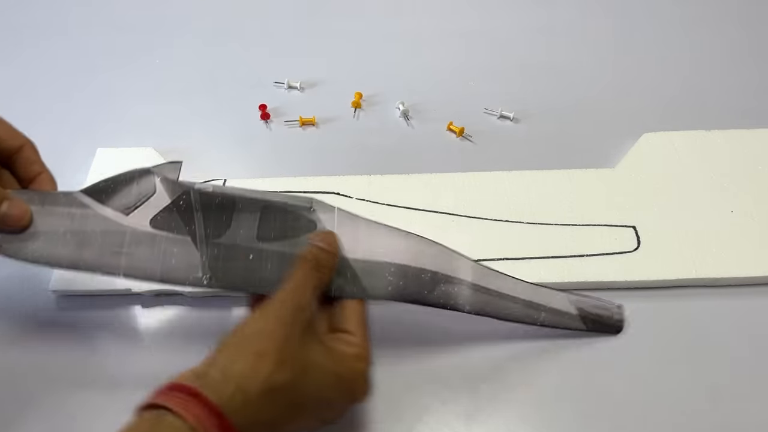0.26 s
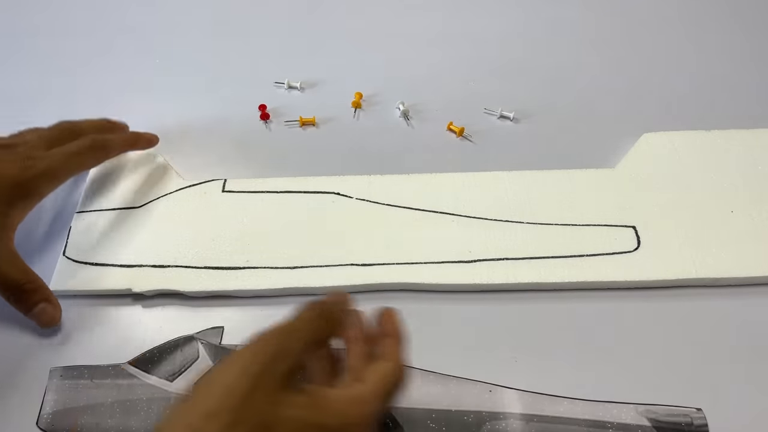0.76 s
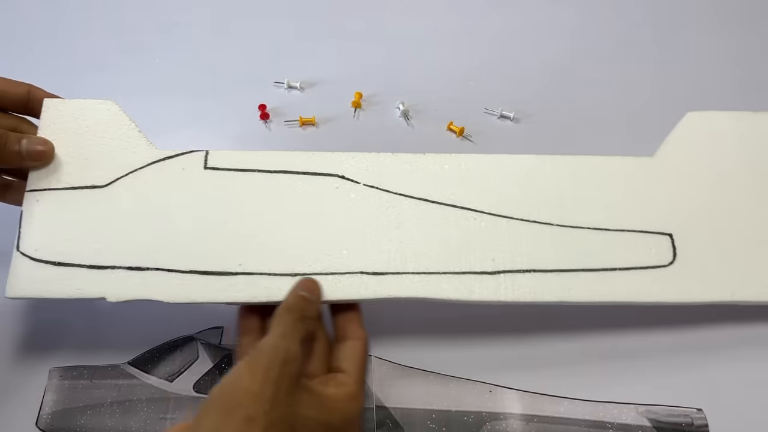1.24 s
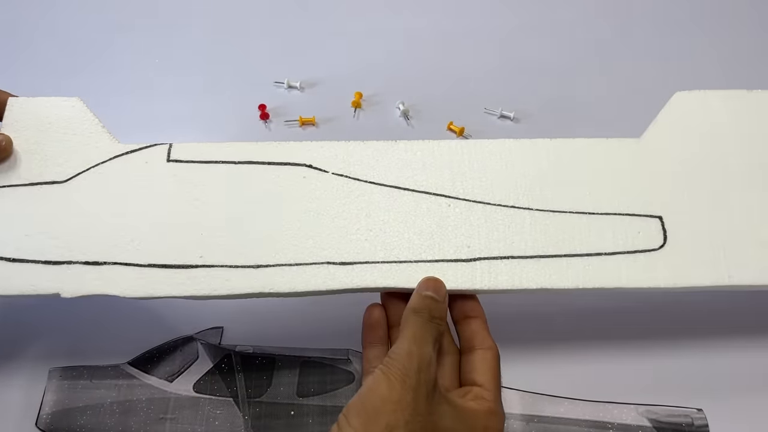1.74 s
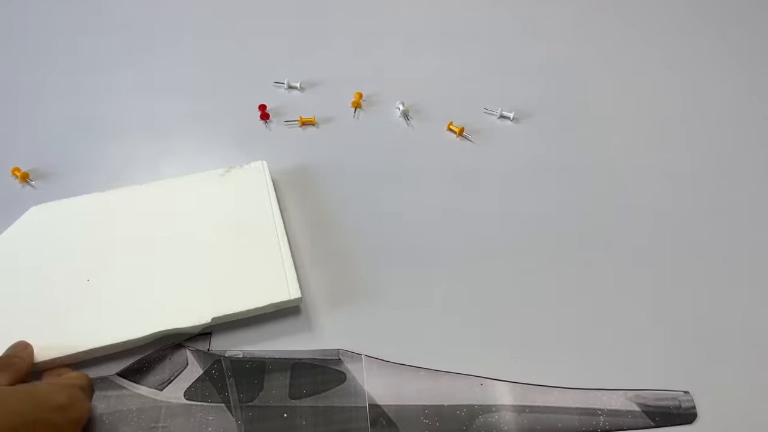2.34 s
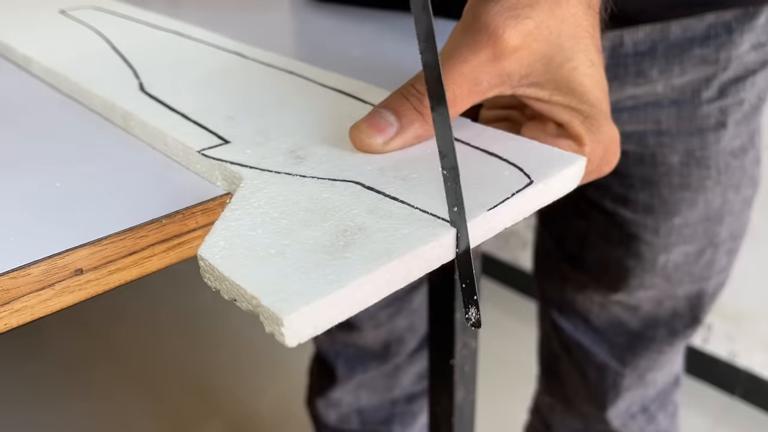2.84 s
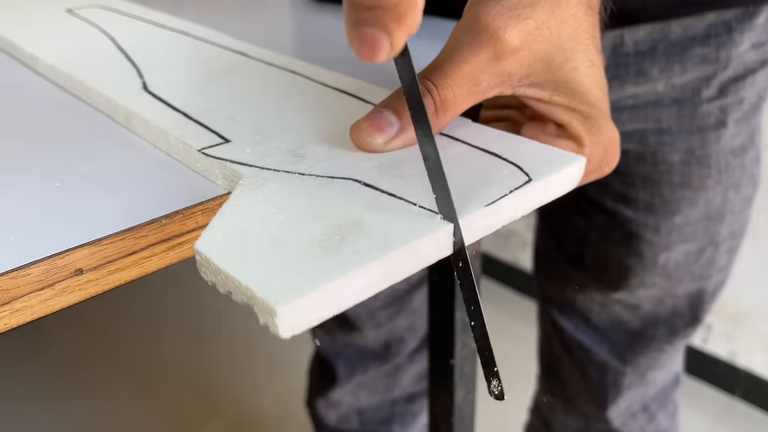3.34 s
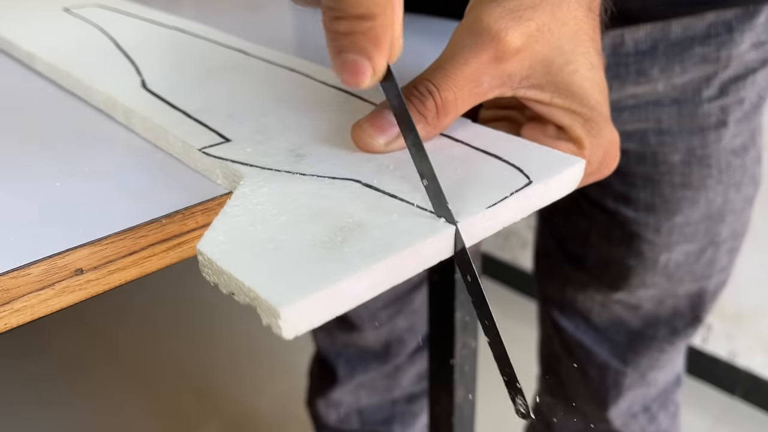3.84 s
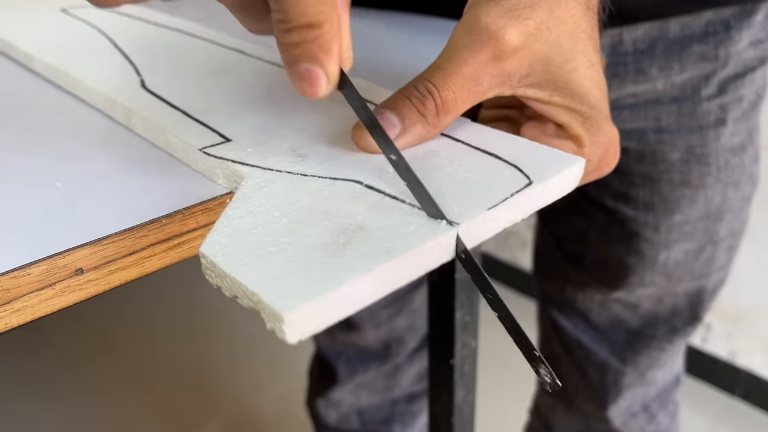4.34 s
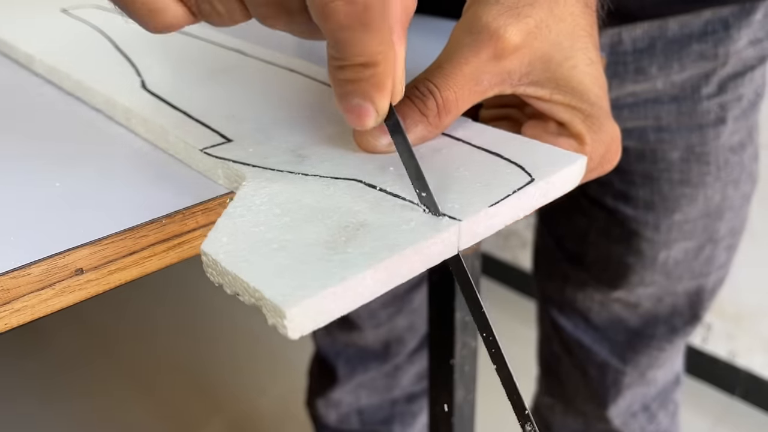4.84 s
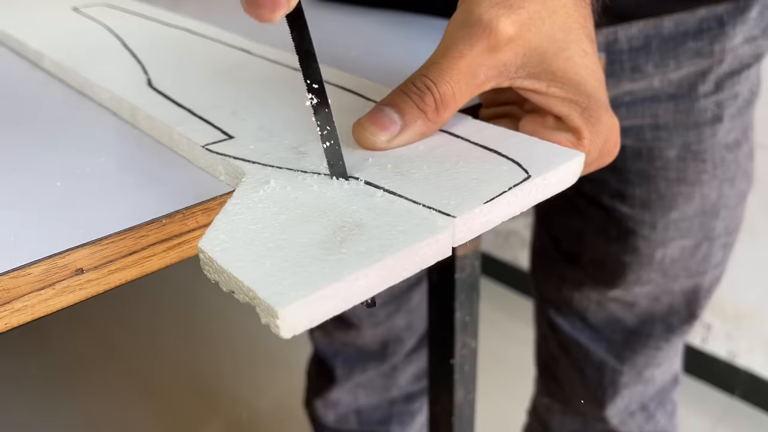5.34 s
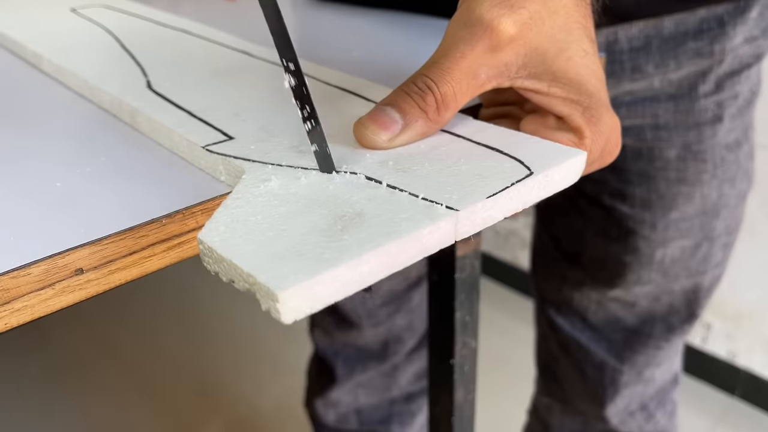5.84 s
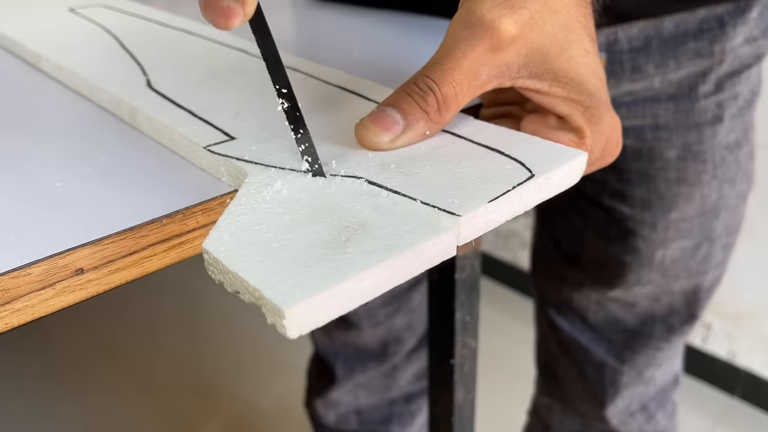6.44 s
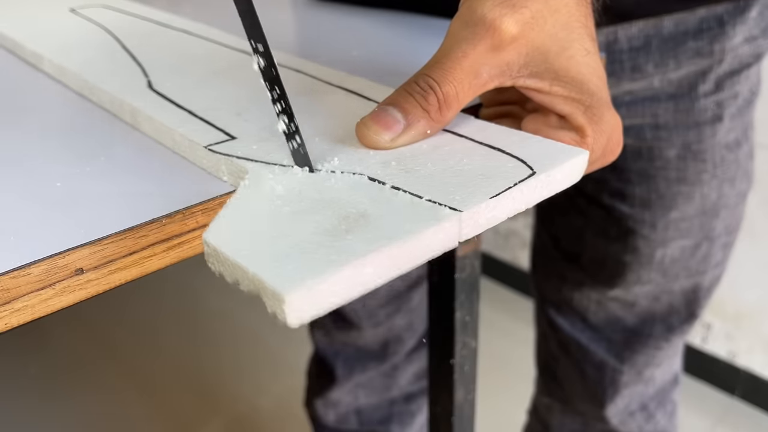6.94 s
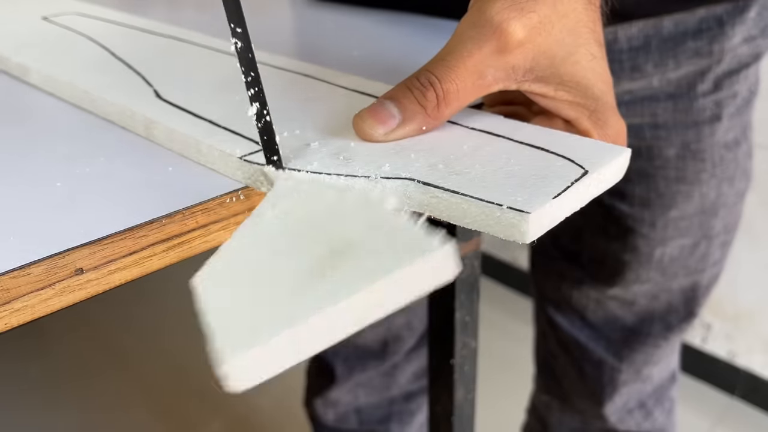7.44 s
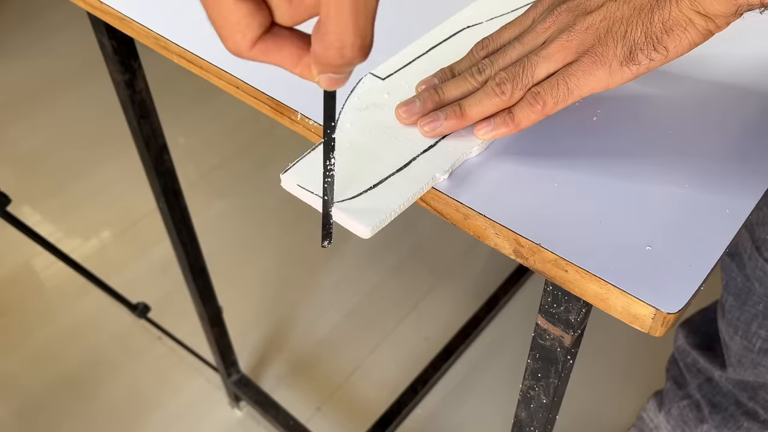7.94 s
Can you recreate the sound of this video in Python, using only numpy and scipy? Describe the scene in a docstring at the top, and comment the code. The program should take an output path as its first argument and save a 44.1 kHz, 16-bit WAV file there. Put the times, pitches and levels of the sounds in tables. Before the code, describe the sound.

Over a low, steady room rumble, paper slides softly and a foam sheet is tapped and shifted on a table. A bare hacksaw blade then saws the foam close to the microphone in quick back-and-forth strokes, a scratchy rasp with hollow shudders and sharp catches. Near the end a bird outside chirps five times, the light offcut drops and bounces, and a new cut begins.

```python
"""Over the low murmur of a building, a paper pattern is lifted; soft taps and slides follow on a foam sheet.
From 2.6 s a bare hacksaw blade saws the sheet at a table edge: its teeth rasp through the cells and
shake the overhang, whose modes sink as the cut frees it. At 7.4 s a bird starts to chirp outside;
at 7.8 s the offcut drops, bounces and settles with a faint rustle, and at 8 s a new cut begins.
Two microphone ports a few centimetres apart hear it all."""
import sys
import numpy as np
from scipy import signal
from scipy.fft import rfft, irfft, next_fast_len
from scipy.io import wavfile
from scipy.ndimage import uniform_filter1d

SR = 44100
rng = np.random.default_rng(int(sys.argv[2]) if len(sys.argv) > 2 else 0)


def dump(signal):
    """Clip the signal to [-1, 1] and save it as 16-bit WAV at the path in sys.argv[1]."""
    limited = np.clip(np.atleast_2d(signal).T, -1, 1)
    pcm = np.round(limited * 32767).astype(np.int16)
    wavfile.write(sys.argv[1], SR, pcm)


N = 361179
T = np.arange(N) / SR
FFT_SIZE = next_fast_len(N)
BAND_LIMIT_HZ = 15800

# Levels in the tables are relative; resonate() multiplies the mode pitches by a tuning factor.
# spectral density of the building's murmur: frequency_hz, level_db
MURMUR_SPECTRUM = [(15, -53), (25, -7), (130, -2.5), (167, -9), (301, -15.5), (366, -12), (404, -15.5),
                   (645, -19.5), (867, -23.5), (1110, -25), (9000, -51.5), (11700, -87.5), (19800, -120)]

# slides over the foam; last, a faint rustle as the offcut falls and settles:
# start_s, length_s, hiss_db, speed_exponent
SLIDES = [(0.032, 0.09, -59, 0.37), (0.133, 0.32, -45, 0.56), (0.42, 0.13, -64.5, 0.32),
          (.56, .1, -58.5, 0.96), (0.785, 0.43, -57.5, 1.1), (1.054, 0.47, -38, 3.3),
          (1.74, 0.33, -37, 1.84), (2.222, .24, -54.5, 1.9), (7.768, 0.28, -59.5, .4)]
# spectrum of sliding friction: frequency_hz, level_db
SLIDE_SPECTRUM = [(900, -8.5), (2500, -7), (4300, -1.5), (6000, -6), (8000, -6), (11500, -8.5),
                  (13500, -12.5), (15600, -6.5)]
# share of the friction that drives the modes, paper first, then sheet: time_s, share_db
MODE_SHARE = [(.5, -13), (1.0, -2)]
# light taps as the paper pattern is lifted, then soft taps on the sheet: start_s, tick_db, tone_db
TAPS = [(0.168, -29, -45.5), (0.2775, -24, -42.5), (0.9694, -21.5, -39.5), (1.0022, -20.5, -35.5),
        (1.0232, -41, -36), (1.516, -65, -32), (2.2454, -42, -48)]
# modes of the loose paper and of the sheet lying on the table: pitch_hz, width_hz, level_db
PAPER_MODES = [(1340, 750, 1.5), (1720, 210, 13.5), (2100, 650, 7), (4150, 300, -14)]
LYING_MODES = [(656, 315, -2), (842, 205, 5), (987, 124, 7.5), (1625, 75, 2), (2425, 280, -3),
               (4700, 190, -3)]
PAPER_UNTIL_S, TAP_CUTOFF_HZ = 0.75, 1600

# blade strokes, push and pull in turn: start_s, length_s, ring_db, flap_db, rasp_db, swell_db
STROKES = [(2.594, 0.045, -37, -31.5, -55, -15), (2.887, 0.063, -35.5, -37.5, -56.5, 4.5),
           (3.023, 0.03, -31, -26.5, -65, -5), (3.137, 0.046, -39, -35.5, -49, -12.5),
           (3.271, 0.015, -29.0, -23, -47.5, -4.5), (3.394, 0.045, -45, -41.5, -55, -19.5),
           (3.494, 0.043, -36, -29, -57.5, 11), (3.627, 0.044, -36, -36, -53, -5),
           (3.763, 0.024, -31, -25.5, -60, -11), (3.872, 0.044, -42.0, -43, -50.5, -21),
           (3.989, 0.058, -39.5, -33.5, -50, -3.5), (4.126, 0.029, -42.5, -37.5, -45.5, -19),
           (4.233, 0.058, -41, -33.5, -47.5, -20.5), (4.37, 0.082, -44, -40.5, -49, -13.0),
           (4.532, 0.14, -45, -38.5, -47.5, -6), (4.758, 0.073, -44.5, -42.5, -44.5, -2),
           (4.917, 0.055, -34, -29, -50, -6), (5.064, 0.059, -39, -37, -45, -2),
           (5.222, 0.021, -41, -37.5, -46, -13.5), (5.309, 0.029, -44, -46, -27, -1),
           (5.414, 0.027, -40, -30.5, -51, -8.5), (5.497, 0.059, -39, -35, -40.5, 2.5),
           (5.612, 0.024, -37.5, -30.5, -35, 11.5), (5.718, 0.052, -41.5, -39.5, -42, 11.5),
           (5.844, 0.035, -40.5, -33, -45.5, 8.5), (5.95, 0.047, -39, -34, -41, 7),
           (6.067, 0.029, -39, -30.5, -38.5, 8.5), (6.175, 0.048, -42.5, -35.5, -41.5, 11.5),
           (6.302, 0.026, -38, -29.5, -39.5, -13), (6.402, 0.04, -45.5, -39.5, -44.5, 9),
           (6.511, 0.031, -36, -29, -38.5, -7.5), (6.611, 0.04, -43, -35, -46.5, 12.5),
           (6.735, 0.028, -36.0, -30, -37, 2), (6.827, 0.054, -47, -41, -40.5, 13.5),
           (6.956, 0.043, -40.5, -29.5, -42, -15.5), (7.055, 0.099, -47.5, -57.5, -48, -5.5),
           (7.208, 0.03, -38, -44.5, -46.5, 15.5), (7.295, 0.053, -46, -54, -44, 5.5),
           (7.426, 0.024, -40, -47.5, -42, -8.5), (7.499, 0.028, -44.5, -58.5, -46.5, 12),
           (8.009, 0.029, -42.5, -40, -51, -19.5), (8.1, 0.063, -41, -45.5, -60, -9)]
# teeth catch and tear free: start_s, rasp_db, jolt_db
CATCHES = [(2.592, -35, -21), (2.603, -20, -35), (2.623, -38, -18), (2.8855, -25, -22.5),
           (3.0214, -20.5, -20), (3.079, -19, -15), (3.1435, -55, -21), (3.269, -18.5, -15.5),
           (3.288, -26, -25.5), (3.398, -45, -23.5), (3.499, -36, -23), (3.5224, -29, -23),
           (3.56, -21.5, -22), (3.763, -29, -21.5), (3.793, -20.5, -16.5), (3.989, -42, -32),
           (4.235, -23.5, -43), (4.53, -38, -29), (4.9244, -21, -31), (5.222, -45, -40.5),
           (5.298, -22, -49), (5.409, -4.5, -39), (5.791, -11.5, -33), (6.659, -12, -44),
           (6.727, -15.5, -47), (6.7634, -45, -27), (6.956, -28, -26), (7.0605, -27, -27.5),
           (7.427, -22, -29), (8.005, -29, -27), (8.1025, -43, -41), (8.15, -45, -28.5), (8.1854, -40, -22)]
# the blade binds against the walls of the slot: start_s, length_s, rasp_db
BINDS = [(4.029, 0.032, -47.0), (4.213, 0.004, -49.5), (4.275, 0.033, -43), (4.575, 0.046, -33),
         (4.681, 0.016, -42), (4.747, 0.0042, -40), (4.884, 0.0082, -49.5), (4.971, 0.042, -43),
         (5.046, 0.015, -44), (5.155, 0.0061, -40), (5.294, 0.019, -30.5), (5.399, 0.014, -24.5),
         (5.408, 0.0081, -22.5), (5.434, 0.021, -35.5), (5.612, 0.01, -33.5), (5.704, 0.0043, -34.5),
         (5.787, 0.0032, -25), (5.839, 0.036, -36.5), (6.14, 0.004, -49), (6.257, 0.052, -36),
         (6.335, 0.0088, -31.5), (6.392, 0.015, -32.5), (6.398, 0.014, -33.5), (6.449, 0.012, -28.5),
         (6.492, 0.025, -37), (6.593, 0.02, -35.5), (6.657, 0.018, -27), (6.725, 0.013, -23),
         (6.897, 0.0047, -37), (6.921, 0.003, -46), (6.938, 0.015, -37), (7.062, 0.0044, -36),
         (7.149, 0.024, -40), (7.21, 0.01, -36), (7.342, 0.026, -31), (7.531, 0.0054, -38.5)]
# the rasp starts before the teeth bite: time_s, lead_s
RASP_LEAD = [(3.8, 0.0022), (4.1, 0.011), (7.6, 0.018), (8.0, .003)]
RASP_LINGER_S, RASP_SWELL_SHARE = 0.013, 0.39
# spectra of the rasp under light and hard pressure: frequency_hz, level_db
LIGHT_RASP_SPECTRUM = [(900, -22), (2500, -5.5), (4000, 1), (5500, -5), (6600, -6), (8500, 1), (10500, 0.5),
                       (12300, -3), (14000, -7), (15600, 2.5)]
HARD_RASP_SPECTRUM = [(2500, -23), (5600, -14.5), (6800, -11.5), (8400, 2.5), (10300, -6), (12300, 4.5),
                      (14000, -7.5), (15600, 2)]
# modes of the slot round the blade: pitch_hz, width_hz, level_db
KERF_MODES = [(3340, 170, -16.5), (4170, 46, 1.5), (5230, 200, 0.5)]
# modes of the sheet while the cut is short: pitch_hz, width_hz, level_db
SHEET_LOW_MODES = [(768, 160, -8), (1082, 72.6, 1.5), (1323, 226, -2.5)]
SHEET_HIGH_MODES = [(1300, 87, -13.5), (1818, 532, 6), (2105, 710, 1.5), (2560, 100, 6), (3700, 3250, -10)]
# modes of the sheet with a long slit: pitch_hz, width_hz, level_db
SLIT_LOW_MODES = [(614, 125, 4), (810, 98, 4.5)]
SLIT_HIGH_MODES = [(1145, 256, 7.5), (1844, 113, 4.5), (2100, 240, -1.5), (2700, 160, -11.5),
                   (3490, 130, -2.5), (3380, 130, -7), (4400, 100, 5), (5400, 210, -18.5)]
LONG_SLIT_S, NEW_CUT_S, NEW_CUT_TUNING = 5.27, 7.9, 0.756
# drive of the slit sheet's low modes on a pull, against a push: time_s, gain_db
PULL_COUPLING = [(5.2, -18), (5.5, -36), (6.2, -17), (7.0, 1.5), (7.5, -15), (8.0, 1)]
# the overhang loosens until 7 s, then rises in pitch: time_s, pitch_factor, table_share_db
STIFFNESS = [(2.5, 0.96, -14.5), (5.26, 0.94, -10), (5.401, 0.62, -16.5), (7.0, 0.47, -24.5),
             (7.2, 1.18, -19), (7.948, 1.38, -22.5)]
# modes of the overhang, and the band it passes to the air: pitch_hz, width_hz, level_db
OVERHANG_MODES = [(150, 90, -8), (208, 85, 0), (265, 95, -4)]
RADIATION_BAND = [(216, 1620, 0)]
# modes of the new cut's short corner and of the table: pitch_hz, width_hz, level_db
CORNER_MODES = [(326, 257, 2), (470, 224, 3), (626, 166, -10)]
TABLE_MODES = [(72, 31, -0.3), (108, 51, -0.44)]

# the bird's chirps: start_s, level_db
CHIRPS = [(7.36, -37), (7.477, -40), (7.594, -42.5), (7.702, -42), (7.81, -43)]
# contour of one chirp: time_s, pitch_hz, level_db
CHIRP_CONTOUR = [(0, 4380, -2), (.01, 4410, -1.5), (.02, 5000, -3), (.03, 5380, 2), (.04, 5620, 5),
                 (.05, 5550, 0), (.058, 5350, -17)]

# the offcut lands and bounces: start_s, tick_db, tone_db
BOUNCES = [(7.7734, -47.5, -47), (7.8109, -71, -39.5), (7.8199, -68, -31), (7.894, -51, -51),
           (7.95, -48.5, -50)]
# modes of the offcut: pitch_hz, width_hz, level_db
OFFCUT_MODES = [(870, 500, -12.5), (1440, 110, -7), (1740, 250, -17), (2397, 49, 4.5), (3300, 370, -6),
                (5440, 1200, -12)]

# the right port against the left: frequency_hz, coherence, level_db, lead_rad
PORTS = [(0, 0.93, 0.1, -0.16), (150, 0.93, -3, 0.65), (350, 1, -4, 1.12), (590, 0.5, -4, 0.6),
         (910, 0.17, -7, -1.47), (1500, 0.95, -1.5, -1.1), (2600, 0.82, -4.5, -1.5), (4650, 0, -9, -2),
         (6960, 0.97, -1, -2.5), (8200, 0.66, -0.5, -0.01), (10890, 1, 0.5, 4.5), (14100, 0.7, 0, 10.5)]


def gain_of(db):
    """Amplitude grows tenfold for every 20 dB."""
    return 10 ** (np.asarray(db) / 20)


def unit_rms(x):
    """Normalisation to unit mean power."""
    return x / np.sqrt(np.mean(x ** 2) + 1e-20)


def butterworth(x, order, cutoff_hz, kind="lowpass"):
    """A filter with a maximally flat passband."""
    return signal.lfilter(*signal.butter(order, cutoff_hz, kind, fs=SR), x)


def spectral_gain(hz, spectrum):
    """Interpolation of a spectrum in dB over log frequency."""
    points_hz, db = np.transpose(spectrum)
    return gain_of(np.interp(np.log(hz + 1), np.log(points_hz + 1), db, left=-80))


def coloured(x, spectrum, above_hz):
    """Spectral shaping, normalised by the power passed between above_hz and the band limit."""
    hz = np.fft.rfftfreq(1024, 1 / SR)
    gain = spectral_gain(hz, spectrum)
    gain /= np.sqrt(np.mean(gain ** 2 * (hz >= above_hz) * (hz < BAND_LIMIT_HZ)))
    impulse = np.fft.fftshift(irfft(gain)) * np.hanning(1024)
    return signal.oaconvolve(x, impulse[None], "same", axes=1)


def resonate(x, modes, tuning=0.96, polarity=-1):
    """Superposition of damped modes; with positive polarity, neighbours cancel between their peaks."""
    out = np.zeros_like(x)
    for k, (hz, width, db) in enumerate(modes):
        phasor = np.exp(2j * np.pi * np.cumsum(hz * tuning * np.ones(N)) / SR)
        pole = np.exp(-np.pi * width / SR)
        amplitude = signal.lfilter([1 - pole], [1, -pole], x * phasor.conj())
        out += polarity ** k * gain_of(db) * 2 * (phasor * amplitude).real
    return out / np.sqrt(sum(gain_of(2 * db) * np.pi * width / SR for _, width, db in modes))


def bursts(events, column, decay_s):
    """Exponential decay after a jump at each event, whose level is in the given column."""
    impulses, rows = np.zeros(N), np.array(events)
    impulses[(rows[:, 0] * SR).astype(int)] = gain_of(rows[:, column])
    return signal.lfilter([1], [1, -np.exp(-1 / (decay_s * SR))], impulses)


def rough_noise(flutter_db, flutter_hz, snap_db):
    """Amplitude modulation: two noises share a slow flutter and brief spikes, as of snapping cells."""
    flutter = unit_rms(butterworth(rng.standard_normal(N), 2, flutter_hz))
    snap_sizes = np.minimum(rng.exponential(1, N // 32 + 1), 5)
    snaps = uniform_filter1d(np.repeat(snap_sizes, 32)[:N], 16)
    return unit_rms(rng.standard_normal((2, N)) * gain_of(flutter_db * flutter + snap_db * snaps))


def building_murmur():
    """Ambient noise: a low, wavering murmur that steps up very slightly at 2.58 s."""
    noise = rough_noise(flutter_db=3.6, flutter_hz=15.6, snap_db=0.1)
    gain = spectral_gain(np.fft.rfftfreq(FFT_SIZE, 1 / SR), MURMUR_SPECTRUM)
    murmur = irfft(rfft(noise, FFT_SIZE) * gain, FFT_SIZE)[:, :N]
    return gain_of(-55.5 + 0.44 * (T > 2.58)) * unit_rms(murmur)


def sliding_envelope():
    """Friction noise follows a power of the sliding speed, which rises and falls in a half sine."""
    return sum(gain_of(db) * np.sin(np.pi * np.clip((T - start) / length, 0, 1)) ** exponent
               * (T < start + length) for start, length, db, exponent in SLIDES)


def slides_and_taps():
    """Sliding friction and soft impacts excite the modes of the paper, then of the lying sheet."""
    friction = rough_noise(flutter_db=2.16, flutter_hz=51, snap_db=1.0)
    sliding = sliding_envelope()
    contact = np.hypot(gain_of(-1.5) * sliding, gain_of(-17) * bursts(TAPS, 1, decay_s=0.014))
    hiss = coloured(friction * contact, SLIDE_SPECTRUM, above_hz=2980)
    taps = gain_of(7.5) * friction * bursts(TAPS, 2, decay_s=0.0076)
    taps += gain_of(20.5) * bursts(TAPS, 2, decay_s=0.00005)
    force = friction * sliding * gain_of(np.interp(T, *np.transpose(MODE_SHARE)))
    force += butterworth(taps, 2, TAP_CUTOFF_HZ)  # soft contact dulls each knock
    on_paper = T < PAPER_UNTIL_S
    return hiss + resonate(force * on_paper, PAPER_MODES) + resonate(force * ~on_paper, LYING_MODES)


def stroke_envelope(starts, lengths, levels_db, swells_db, rise_db_s, fall_db_s):
    """Piecewise exponential gain: each stroke rises fast, swells or sags, and dies away."""
    out_db = np.full(N, -120.)
    for start, length, level, swell in np.broadcast(starts, lengths, levels_db, swells_db):
        span = slice(round((start - 0.05) * SR), round((start + length + 0.2) * SR))
        t = T[span] - start
        body = level + swell * (np.clip(t / length, 0, 1) - 0.5)
        edges = rise_db_s * np.minimum(t, 0) - fall_db_s * np.maximum(t - length, 0)
        out_db[span] = np.maximum(out_db[span], body + edges)
    return gain_of(out_db)


def per_stroke(values):
    """Sample and hold: each stroke's value takes over 10 ms before it starts."""
    index = np.searchsorted(np.transpose(STROKES)[0], T + 0.01) - 1
    return values[np.maximum(index, 0)]


def tooth_rasp(friction):
    """Incoherent sources add in power: strokes, binds and catches make a rasp that pressure brightens."""
    start, length, _, _, rasp_db, swell_db = np.transpose(STROKES)
    lead = np.interp(start, *np.transpose(RASP_LEAD))
    cutting = stroke_envelope(start - lead, length + lead + RASP_LINGER_S, rasp_db,
                              RASP_SWELL_SHARE * swell_db, rise_db_s=1580, fall_db_s=770)
    binding = stroke_envelope(*np.transpose(BINDS), swells_db=4, rise_db_s=2554, fall_db_s=1497)
    catching = gain_of(-5.5) * bursts(CATCHES, 1, decay_s=0.0021)
    envelope = np.sqrt(gain_of(-3.5) * cutting ** 2 + gain_of(1) * binding ** 2 + catching ** 2)
    pressure = np.clip(uniform_filter1d(envelope, 400) / gain_of(-32.5), 0, 1)
    rasp = friction * envelope
    light = coloured(rasp * np.sqrt(1 - pressure ** 2), LIGHT_RASP_SPECTRUM, above_hz=6260)
    hard = coloured(rasp * pressure, HARD_RASP_SPECTRUM, above_hz=6500)
    # the blade sits differently in the slot at each stroke
    kerf_tuning = 1 + 0.02 * per_stroke(rng.standard_normal(len(STROKES)))
    return light + hard + gain_of(-13) * resonate(rasp, KERF_MODES, kerf_tuning)


def sheet_ring(friction):
    """Forced vibration: the teeth drag on the sheet, whose modes change with the long slit and new cut."""
    start, length, ring_db, _, _, swell_db = np.transpose(STROKES)
    drag = stroke_envelope(start, length, ring_db, swell_db, rise_db_s=2970, fall_db_s=730)
    force = friction * np.hypot(gain_of(7) * drag, gain_of(2.2) * bursts(CATCHES, 2, decay_s=0.0075))
    force += gain_of(-5) * bursts(CATCHES, 2, decay_s=0.0001)  # the jolt of a catch
    pulling = np.arange(len(STROKES)) % 2
    coupling = gain_of(per_stroke(pulling * np.interp(start, *np.transpose(PULL_COUPLING))))
    slit = (T > LONG_SLIT_S) & (T < NEW_CUT_S)
    tuning = np.where(T > NEW_CUT_S, NEW_CUT_TUNING, 1)
    sheet = resonate(force * ~slit, SHEET_LOW_MODES, tuning)
    sheet += gain_of(-1) * resonate(force * ~slit, SHEET_HIGH_MODES, tuning)
    sheet += resonate(force * slit * coupling, SLIT_LOW_MODES, tuning=0.99)
    sheet += gain_of(-3) * resonate(force * slit, SLIT_HIGH_MODES, tuning=0.92, polarity=0.97)
    return butterworth(sheet, 3, 540, "highpass")


def overhang_and_table(friction):
    """A cantilever's modes fall with its stiffness; part of the force on it thuds in the table."""
    start, length, _, flap_db, _, swell_db = np.transpose(STROKES)
    drag = stroke_envelope(start, length, flap_db, swell_db, rise_db_s=3140, fall_db_s=670)
    force = gain_of(13) * friction * drag + gain_of(1.5) * bursts(CATCHES, 2, decay_s=0.00046)
    time_s, pitch_factor, table_share_db = np.transpose(STIFFNESS)
    tuning = np.interp(T, time_s, pitch_factor)
    bending = resonate(force * (T < NEW_CUT_S), OVERHANG_MODES, tuning)
    overhang = gain_of(-16) * resonate(bending, RADIATION_BAND, tuning)
    overhang += resonate(force * (T >= NEW_CUT_S), CORNER_MODES, tuning=1)
    table = resonate(force * gain_of(np.interp(T, time_s, table_share_db)), TABLE_MODES)
    return butterworth(overhang, 2, 70, "highpass") + butterworth(table, 2, [45, 160], "bandpass")


def saw():
    """Friction at the teeth radiates directly and through the structures that it drives."""
    teeth = rough_noise(flutter_db=3.7, flutter_hz=46, snap_db=1.63)
    drag = rough_noise(flutter_db=2.57, flutter_hz=59, snap_db=1.92)
    return tooth_rasp(teeth) + gain_of(-3) * sheet_ring(drag) + overhang_and_table(drag)


def bird():
    """Frequency modulation of a pure tone gives rising whistles, each tuned a little differently."""
    time_s, pitch_hz, contour_db = np.transpose(CHIRP_CONTOUR)
    out, t = np.zeros(N), np.arange(0, time_s[-1], 1 / SR)
    for (start, level_db), tuning in zip(CHIRPS, rng.uniform(0.985, 1.015, len(CHIRPS))):
        phase = 2 * np.pi * np.cumsum(tuning * np.interp(t, time_s, pitch_hz)) / SR
        envelope = gain_of(level_db + np.interp(t, time_s, contour_db)) * signal.windows.tukey(len(t), 0.2)
        out[round(start * SR):][:len(t)] += envelope * np.sin(phase)
    # moving air roughens the far sound
    out *= 1 + 0.12 * unit_rms(uniform_filter1d(rng.standard_normal(N), 200))
    return np.array([out, out])


def offcut():
    """Impact excitation: each bounce on the floor ticks and rings the modes of the light piece."""
    noise = rng.standard_normal((2, N))
    tick = coloured(noise * bursts(BOUNCES, 1, decay_s=0.0059), LIGHT_RASP_SPECTRUM, above_hz=6500)
    force = gain_of(6) * noise * bursts(BOUNCES, 2, decay_s=0.0081)
    force += gain_of(10) * bursts(BOUNCES, 2, decay_s=0.00004)
    return tick + resonate(force, OFFCUT_MODES)


def reverberation(x, t60_s, first_s):
    """Sparse reflections of random sign decay exponentially, duller than the direct sound."""
    t = np.arange(SR // 2) / SR
    grid = np.arange(0, len(t) - 20, 20)
    arrivals = grid + rng.integers(0, 20, (2, len(grid)))
    echoes = np.zeros((2, len(t)))
    np.put_along_axis(echoes, arrivals, rng.choice([-1., 1.], arrivals.shape), 1)
    echoes *= gain_of(-60 * t / t60_s) * (t > first_s)
    dulled = signal.lfilter([1], [1, -0.5], echoes / np.linalg.norm(echoes[0]))
    return signal.oaconvolve(x, dulled, axes=1)[:, :N]


def scene():
    """Sources and reflections superpose; row 0 is the left port, row 1 feeds only the right."""
    near, far = saw() + slides_and_taps() + offcut(), bird()
    near += gain_of(-16.5) * reverberation(near, t60_s=0.19, first_s=0.011)
    far += gain_of(-14) * reverberation(far, t60_s=1.0, first_s=0.0088)
    return near + far + building_murmur()


def record(dry):
    """Partial coherence: the right port hears a shaded, shifted share of the left; both are low-passed."""
    hz = np.fft.rfftfreq(FFT_SIZE, 1 / SR)
    points_hz, *columns = np.transpose(PORTS)
    coherence, level_db, lead_rad = (np.interp(hz, points_hz, column) for column in columns)
    left, other = rfft(dry, FFT_SIZE)
    right = coherence * left + np.sqrt(1 - coherence ** 2) * other
    right *= gain_of(level_db) * np.exp(1j * lead_rad)
    ports = np.array([dry[0], irfft(right, FFT_SIZE)[:N]])
    lowpass = signal.firwin(511, BAND_LIMIT_HZ, window=("kaiser", 9), fs=SR)
    return signal.oaconvolve(ports, lowpass[None], "same", axes=1)


dry = scene()
out = record(dry)
dump(out)
```